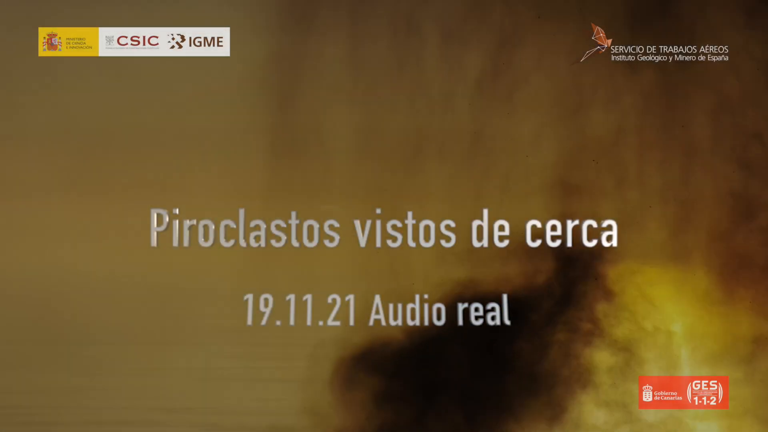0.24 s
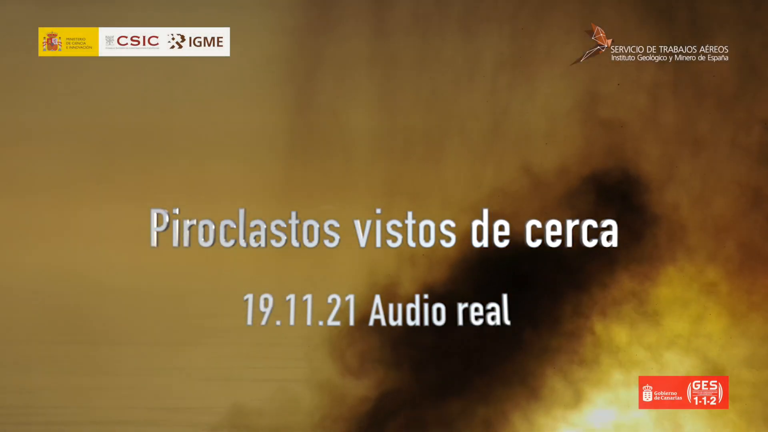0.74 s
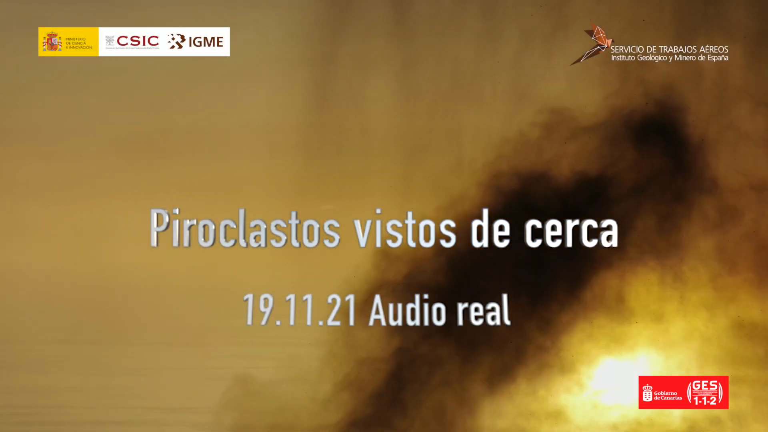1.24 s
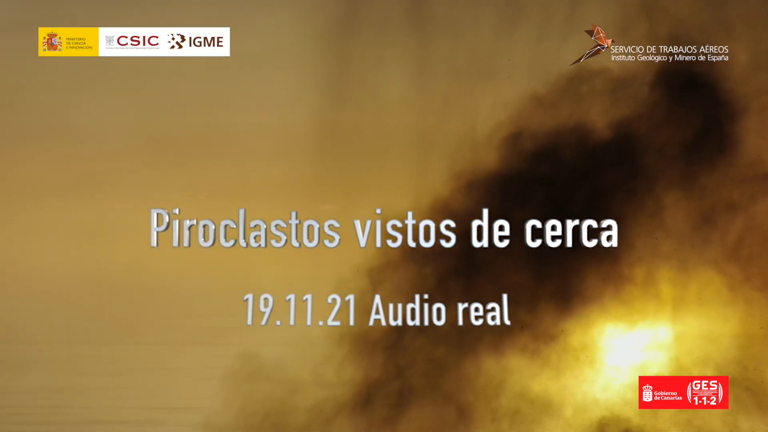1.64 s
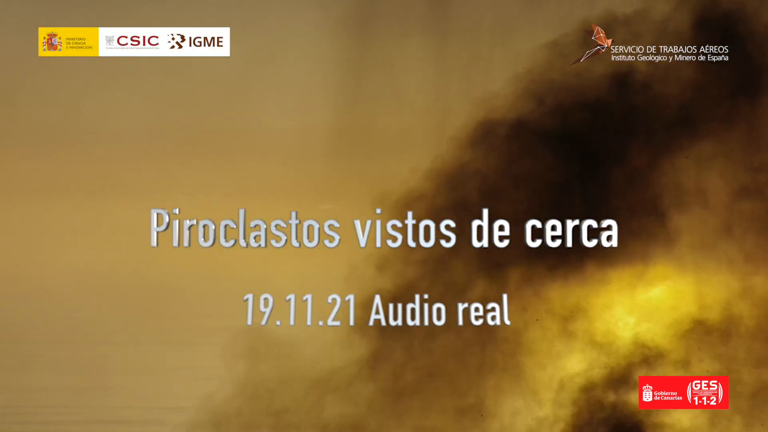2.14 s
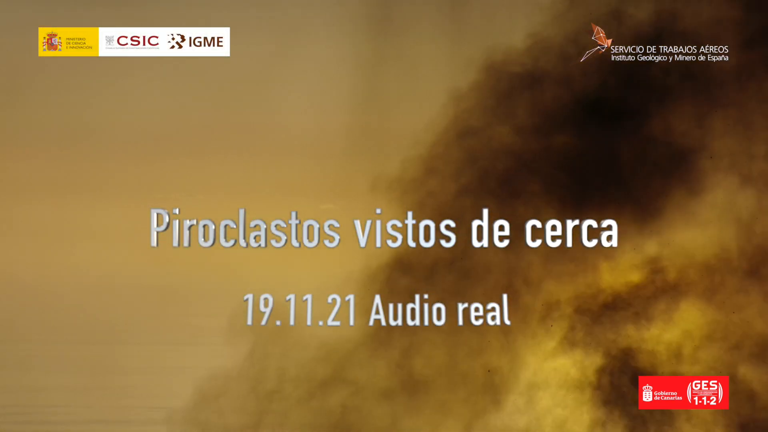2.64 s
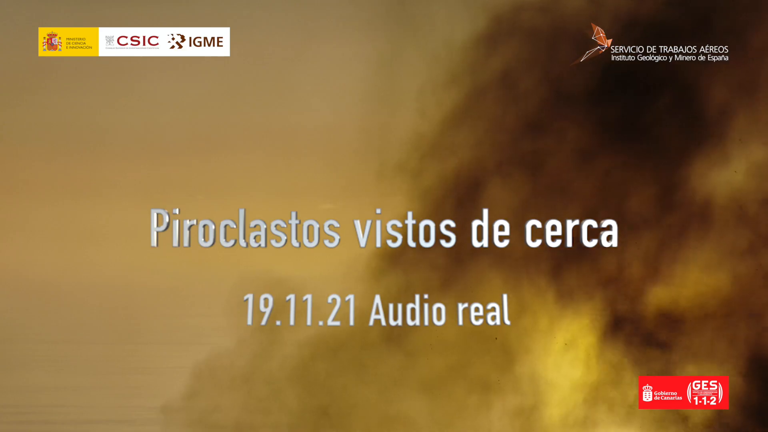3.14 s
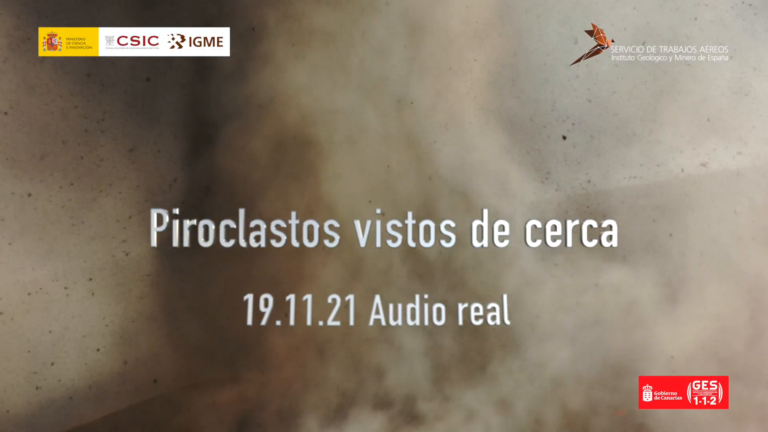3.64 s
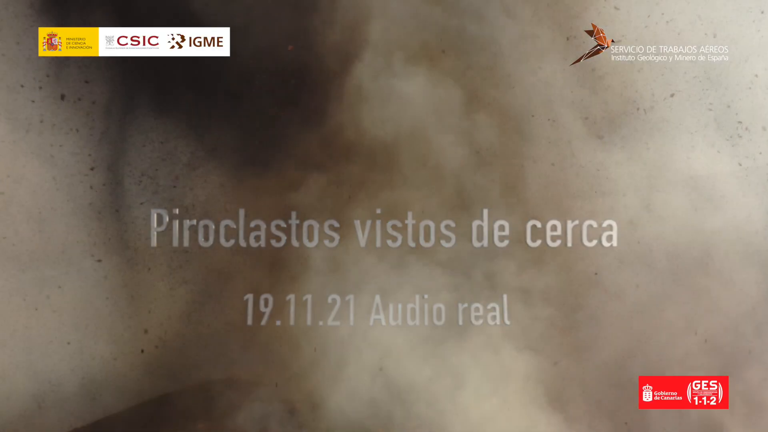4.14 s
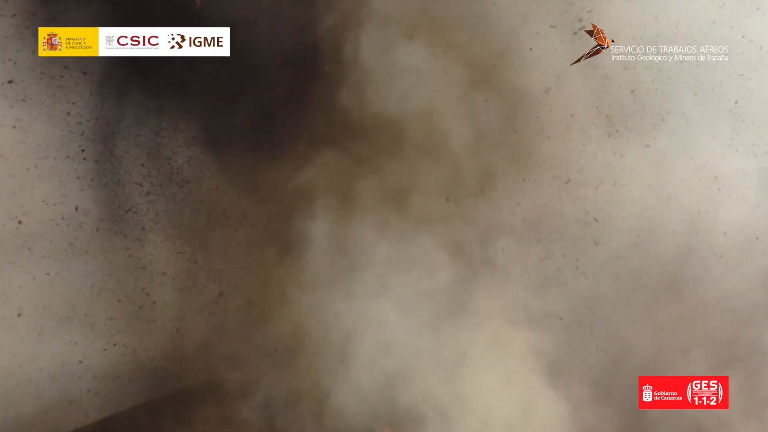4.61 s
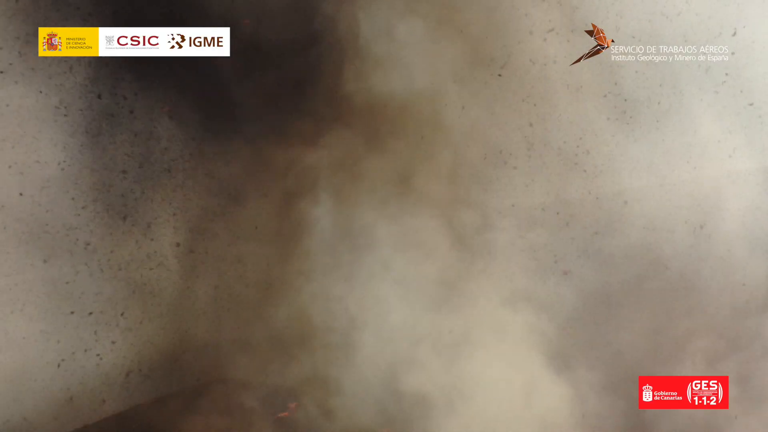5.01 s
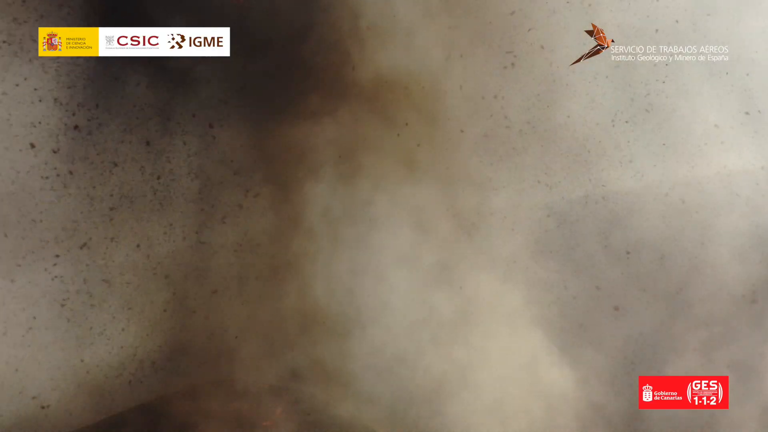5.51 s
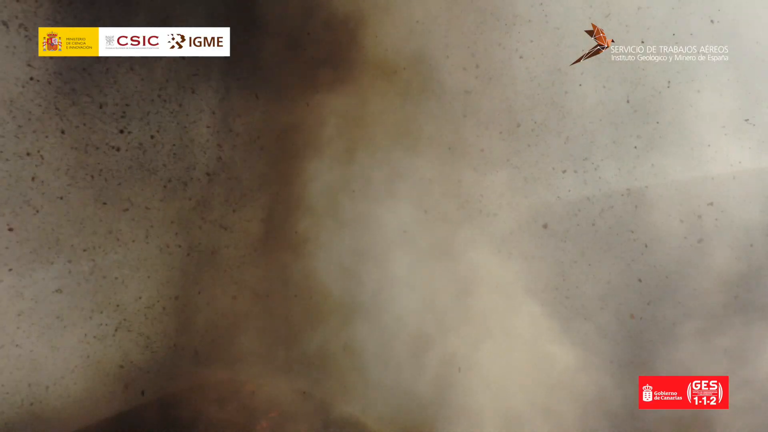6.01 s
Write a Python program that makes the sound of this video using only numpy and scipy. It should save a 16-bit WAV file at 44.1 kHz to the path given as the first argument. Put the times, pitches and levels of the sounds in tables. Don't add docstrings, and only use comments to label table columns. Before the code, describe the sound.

A distant volcanic vent roars and rumbles, a heavy burst near one second, crackling overloaded surges, then easing under low wind buffeting and ticking ash.

```python
import sys
import numpy as np
from scipy import signal
from scipy.fft import rfft, irfft, next_fast_len
from scipy.io import wavfile
from scipy.ndimage import uniform_filter1d, minimum_filter1d

SR = 44100
rng = np.random.default_rng(int(sys.argv[2]) if len(sys.argv) > 2 else 0)


def undo_db(level):
    steps = np.asarray(level, float) / 20
    return 10 ** steps


def store_wav(level_fs):
    pcm = np.round(np.clip(np.atleast_2d(level_fs), -1, 1) * 32767)
    wavfile.write(sys.argv[1], SR, pcm.T.astype(np.int16))


N = 276066
FFT_SIZE = next_fast_len(N)
BIN_HZ = np.maximum(np.arange(FFT_SIZE // 2 + 1) * SR / FFT_SIZE, 1)
TIME_S = np.arange(N) / SR
LAG_S = 0.0017


def rms_one(x):
    return x / np.sqrt(np.mean(x ** 2) + 1e-20)


def in_time(rows):
    seconds, *columns = np.transpose(rows)
    return [np.interp(TIME_S, seconds, column) for column in columns]


def response(points):
    hz, db = np.transpose(points)
    return undo_db(np.interp(np.log(BIN_HZ), np.log(hz), db))


def white(channels):
    return rfft(rng.standard_normal((channels, FFT_SIZE)))


def coloured_noise(colour):
    return irfft(white(channels=2) * response(colour), FFT_SIZE)[:, :N]


def drift(rate):
    r = np.exp(-80 * np.pi * rate / SR)
    coarse = rng.standard_normal(N // 40 + 2002)
    slow = signal.lfilter([1], [1, -2 * r, r * r], coarse)[2000:]
    return np.interp(np.arange(N) / 40, np.arange(len(slow)), rms_one(slow))


def steadied(x):
    steadiness, span = 0.49, round(0.25 * SR)
    power = uniform_filter1d(uniform_filter1d(np.mean(x ** 2, axis=0), span), span)
    return rms_one(x / (power + 1e-3) ** (steadiness / 2))


def swells(rows, rise_s, fall_db_per_s, rest_db):
    t = np.arange(0, N + 40, 40) / SR
    power = undo_db(2 * rest_db)
    for s, db, hold in rows:
        falling_s = np.maximum(t - s - rise_s - hold, 0)
        rise = np.clip((t - s) / rise_s, 0, 1)
        power = power + undo_db(2 * (db - fall_db_per_s * falling_s)) * rise ** 2
    return np.interp(TIME_S, t, 10 * np.log10(power))


def left_right(db):
    return db * np.array([[0.5], [-0.5]])


# start in seconds,
# peak of the rumble in dB, peak of the boom in dB.
LOW_SURGES = [(-.05, -36.5, -21.5), (.17, -20.5, -22.5), (.38, -22.5, -20.5), (.66, -14, -25.5),
              (.74, -15.5, -20), (0.891, -24.5, -17.5), (.98, -2.5, -10), (1.18, -9.5, -11.5),
              (1.33, -14, -21), (1.56, -12, -17), (1.86, -9, -15), (2.141, -17.5, -12), (2.36, -17.5, -19),
              (2.6, -18.5, -20), (2.78, -21.5, -15), (3.099, -19, -17.5), (3.42, -20.5, -15.5),
              (3.84, -19.5, -20), (4.2, -33, -23), (4.5, -40, -27), (4.75, -50, -33), (5.55, -24, -32),
              (6.1, -20.5, -27)]
# time in seconds, flow (the roar) in dB, jet speed (extra brightness) in dB.
GAS_FLOW = [(0, -18, -1.5), (.6, -16.5, -3.5), (.82, -12.5, -1.5), (1.25, -12.5, -1), (1.5, -12.5, .5),
            (2.1, -10.5, -2), (2.4, -13.5, 1.5), (2.6, -11, -1), (3.25, -12.5, 0), (3.5, -10.5, -1.5),
            (4.0, -13.5, 1.5), (4.9, -18, 2), (5.78, -18, -1), (5.88, -21, 1), (6.05, -18, -0.5),
            (6.26, -14, -3.5)]


def eddy_levels():
    rise_s, calm_db = 0.035, -46
    rumble = swells([(s, db, 0) for s, db, _ in LOW_SURGES], rise_s, 25, calm_db)
    boom = swells([(s, db, 0) for s, _, db in LOW_SURGES], rise_s, 18.5, calm_db)
    flow, speed = in_time(GAS_FLOW)
    rush = -26 + 1.41 * (flow - flow.mean()) + speed
    return rumble, boom, flow, rush


EDDY_SPLITS_HZ = (85, 270, 1400)
# pitch in Hz, level in dB per Hz.
JET_COLOUR = [(12, -10.5), (30, -8.5), (60, -3.5), (150, 2), (270, -11.5), (550, -8), (1050, -9),
              (1400, -11), (1800, -8.5), (2100, -15), (2600, -20), (3000, -30.5), (3700, -44.5),
              (5000, -79)]
# pitch in Hz, left minus right in dB.
PORT_LEAN = [(60, 0), (140, 0), (210, -.5), (320, 1.5), (740, 1.5), (1130, .5), (2600, .5)]
# pitch in Hz, level in dB relative to the direct jet.
SCATTERED = [(60, -52.5), (200, -19.5), (300, -14.5), (600, -24.5), (1500, -21), (3000, -29)]


def jet():
    echo_s, echo_share, echo_dull_hz = 0.001869, 0.36, 600
    echo = echo_share / np.sqrt(1 + (BIN_HZ / echo_dull_hz) ** 2)
    echo = echo * np.exp(-2j * np.pi * BIN_HZ * echo_s)
    direct, *scattered = white(channels=3)
    lean = np.sqrt(response(PORT_LEAN))
    ports = direct * np.array([lean, 1 / lean]) + response(SCATTERED) * np.array(scattered)
    ports = ports * response(JET_COLOUR) * (1 + echo)
    above = [1] + [1 / (1 + (hz / BIN_HZ) ** 10) for hz in EDDY_SPLITS_HZ] + [0]
    flutters_db = (0.2, 0.44, 0.29, 0.18)
    out = 0
    for level_db, lower, upper, flutter_db in zip(eddy_levels(), above, above[1:], flutters_db):
        band = irfft(ports * (lower - upper), FFT_SIZE)[:, :N]
        out = out + undo_db(level_db + flutter_db * drift(13.0)) * steadied(rms_one(band))
    return out


# start in seconds, peak in dB, length in seconds.
GAS_BURSTS = [
    (0.679, -3, 0.007),
    (0.759, -8.5, 0.023),
    (0.832, -7, 0.0085),
    (0.988, 1, 0.016),
]


def bursts():
    out, t = np.zeros(N), np.arange(2600) / SR
    for s, peak_db, length_s in GAS_BURSTS:
        u = t / length_s * 1.9
        at = round(s * SR)
        out[at:at + len(t)] += undo_db(peak_db + 11.5) * u * (1.3 - u) * np.exp(-1.3 * u)
    return out


# time in seconds, peak in dB, left minus right in dB, pitch in Hz.
ASH_GRAINS = [(0.2572, -33, -1.5, 13500), (0.2674, -32, -9, 13550), (0.2887, -37.5, -1.5, 15700),
              (0.6403, -31.5, 0, 15100), (0.6892, -31.5, 1.5, 11780), (1.2225, -43, 11, 8080),
              (1.905, -40, -3, 11500), (2.7136, -44, 4, 11630), (3.674, -37, -2, 10700),
              (4.0326, -38, -6.5, 11900), (4.1149, -33.5, -12, 11060), (4.155, -32.5, 0, 12400),
              (4.3379, -38.5, -8, 8660), (4.8627, -38, -2, 13150), (4.8772, -25.5, -8, 13200),
              (5.0339, -35.5, 4.5, 8780), (5.2748, -35, 1, 8900), (5.2978, -34.5, -3.5, 14960),
              (5.3447, -32, 7.5, 14600), (5.4765, -32, -2.5, 11140), (5.5996, -38, 4, 14270)]


def ash():
    out, t = np.zeros((2, N)), np.arange(128) / SR
    count = round(73 * N / SR)
    when, strength, side, pitch = rng.random((count, 4)).T
    fine_db = -55 - 5.0 * np.log(strength + 0.02)
    fine = np.c_[when * (N - 400) / SR, fine_db, 8 * (side - 0.5), 7000 + 7500 * pitch]
    for s, peak_db, pan_db, hz in list(ASH_GRAINS) + list(fine):
        tick = np.sin(2 * np.pi * hz * t) * np.exp(-t / 0.00008)
        tick = tick + 0.18 * np.sin(np.pi * hz * t) * np.exp(-t / 0.00015)
        at = round((s + LAG_S) * SR)
        out[:, at:at + len(t)] += undo_db(peak_db + 9 + left_right(pan_db)) * tick
    return out


# pitch in Hz, level in dB per Hz.
WIND_TONE = [(12, -12), (30, -1), (52, 0), (95, -6), (140, -19), (220, -36), (500, -60), (1200, -110)]
# start in seconds, level in dB, hold in seconds.
WIND_GUSTS = [(.15, -48, .2), (.8, -46, .35), (1.25, -40, .2), (1.82, -38, .25), (2.3, -41, .5),
              (2.88, -32, .1), (3.05, -38, .2), (3.93, -38, .1), (4.22, -35, .4), (4.82, -26.5, .45),
              (5.38, -25, .05), (5.46, -19.5, .5), (6.08, -22, .3)]


def wind():
    buffet = [steadied(rms_one(port[None])) for port in coloured_noise(WIND_TONE)]
    gusts_db = swells(WIND_GUSTS, rise_s=0.027, fall_db_per_s=91.5, rest_db=-59)
    flutter_db = 0.67 * np.array([drift(8), drift(7.3)])
    return undo_db(gusts_db + flutter_db) * np.vstack(buffet)


# time in seconds, level in dB.
HISS_LEVEL = [(0, -55.5), (1.0, -56.5), (2.0, -60.5), (2.3, -64), (2.7, -60.5), (3.7, -56.5), (6.26, -56.5)]
# pitch in Hz, level in dB per Hz.
HISS_TONE = [(1500, -1.5), (3000, 5.5), (4500, 6.5), (6300, 3), (8500, -1.5), (11000, 3), (13000, 3.5),
             (16000, 3.5)]


def hiss():
    return undo_db(in_time(HISS_LEVEL)[0] + 6.0) * rms_one(coloured_noise(HISS_TONE))


# pitch in Hz, rms level in dB.
WHINE_TONES = [(15092, -76)]


def whine():
    out = 0
    for hz, db in WHINE_TONES:
        phase = 2 * np.pi * hz * TIME_S + 1.1 * drift(6.0)
        out = out + np.sqrt(2) * undo_db(db) * np.sin(phase)
    return out


def limiter(x):
    limit, grip = 1.02, 0.84
    release_db_per_s, look_ahead_s = 500, 0.003
    over_db = np.maximum(20 * np.log10(np.abs(x).max(axis=0) / limit + 1e-9), 0)
    ramp = release_db_per_s * TIME_S
    held = np.maximum.accumulate(over_db + ramp) - ramp
    span = round(look_ahead_s * SR)
    ahead = -minimum_filter1d(-held, size=2 * span + 1)
    smooth = uniform_filter1d(uniform_filter1d(ahead, size=span), size=span)
    return x * undo_db(-grip * smooth)


# time in seconds, peak of the crackle in dB, left minus right in dB.
TALL_CRESTS = [(0.682, -29, 0.0), (0.7931, -30, 1.5), (0.8325, -32, 2.0), (0.9613, -31.5, 5),
               (1.0096, -22, 2.5), (1.039, -29, -3), (1.088, -29.5, 0.5), (1.1555, -33, 2),
               (1.1857, -28, 1.5), (1.2417, -33, 4.5), (1.3347, -27.5, 3), (1.366, -29, -0.5),
               (1.445, -32.5, 1), (1.488, -28.5, 2), (1.5997, -27.5, 2.5), (1.6316, -27, -0.5),
               (1.696, -32, 5.5), (1.823, -27, 4.5), (1.9612, -24.5, 0.5), (2.0358, -26.5, 2),
               (2.1705, -29, 3), (2.2664, -27, 3), (2.352, -28, 1.5), (2.4867, -26.5, 2.5),
               (2.7597, -28.5, 1.5), (2.9284, -27.5, 3.5), (3.045, -32, 7.5), (3.2043, -28, 4.5),
               (3.2804, -28.5, 1.5), (3.4088, -25.5, 5)]
GRAZED_CRESTS_S = [.758, .978, 1.067, 1.12, 1.199, 1.267, 1.413, 1.533, 1.617, 1.654, 1.757, 1.867, 1.905,
                   2.093, 2.184, 2.212, 2.237, 2.309, 2.383, 2.538, 2.595, 2.703, 2.867, 3.134, 3.175,
                   3.355, 3.508]


def shaved_crests():
    out, t_ms = np.zeros((2, N)), np.arange(200) / SR * 1000
    crests = list(TALL_CRESTS) + [(s, -34, 4.5) for s in GRAZED_CRESTS_S]
    chance = rng.random((len(crests), 4))
    for (s, peak_db, pan_db), (side, breadth, spacing, ripple) in zip(crests, chance):
        width_ms = 0.19 + 0.41 * breadth
        caps = 0
        for start_ms, height in ((0, 1), (1.1 + 2.5 * spacing, 0.36 * ripple ** 3)):
            u = np.clip((t_ms - start_ms) / width_ms, 0, 1)
            caps = caps + height * width_ms * u * (1 - u) ** 2.3
        at = round((s + LAG_S - width_ms / 2000) * SR)
        level = undo_db(peak_db + 45.5 + left_right(pan_db))
        out[:, at:at + len(t_ms)] += np.sign(side - 0.5) * level * caps
    return signal.lfilter(*signal.butter(1, 7000.0, fs=SR), out)


def scene():
    return jet() + bursts() + ash() + wind()


def low_pass(x):
    return signal.sosfilt(signal.butter(12, 15800, fs=SR, output="sos"), x)


def record(dry):
    limited = limiter(dry + hiss() + whine())
    mix = np.clip(limited + shaved_crests(), -1.0, 1.0)
    return low_pass(mix)


dry = scene()
out = record(dry)
store_wav(out)
```